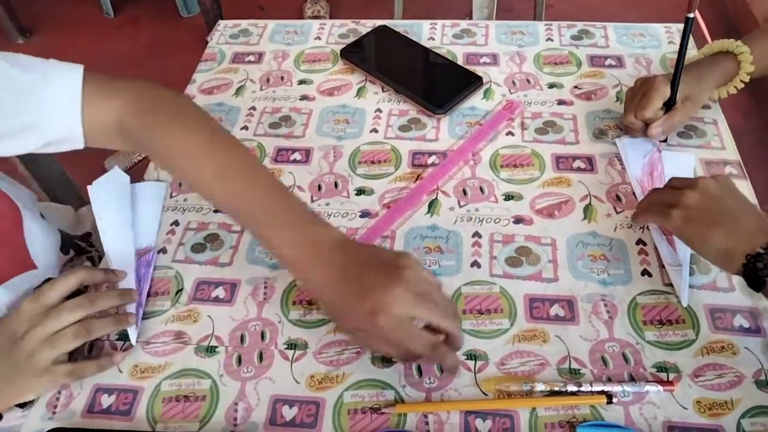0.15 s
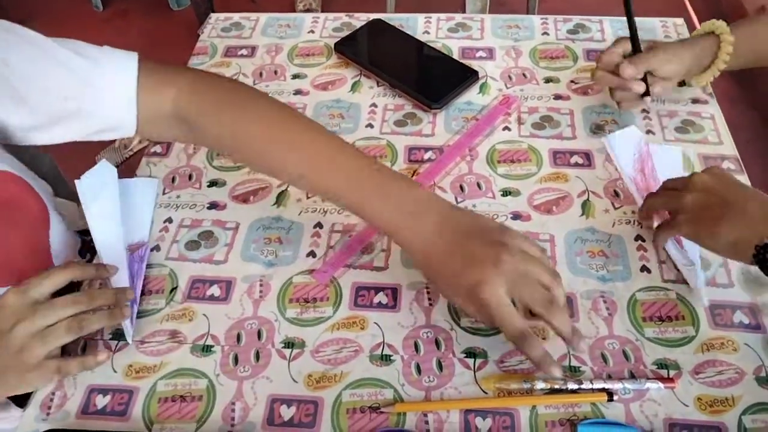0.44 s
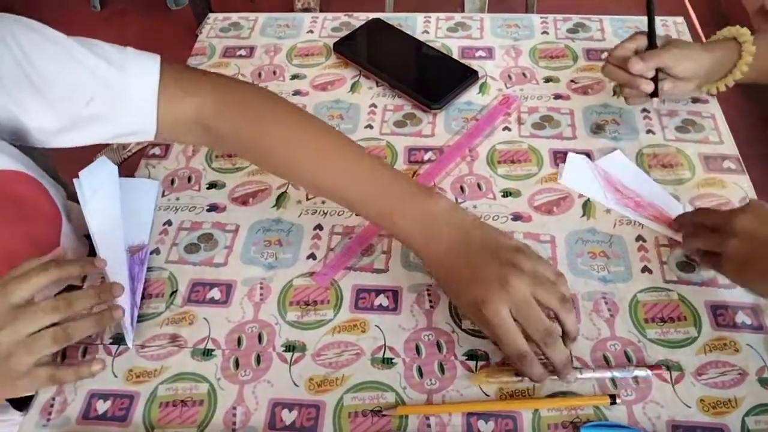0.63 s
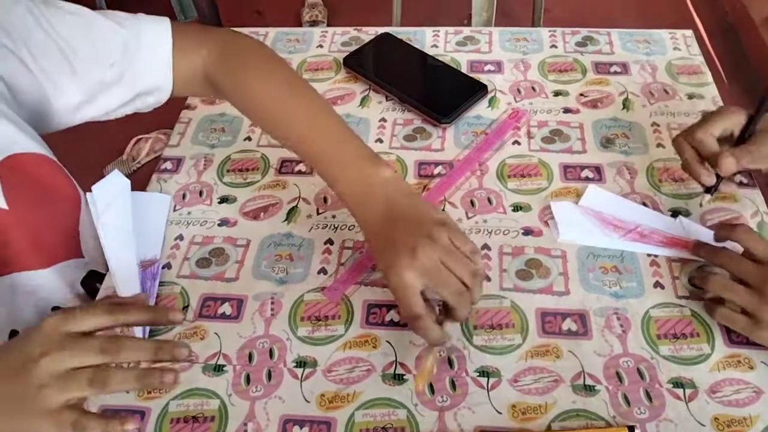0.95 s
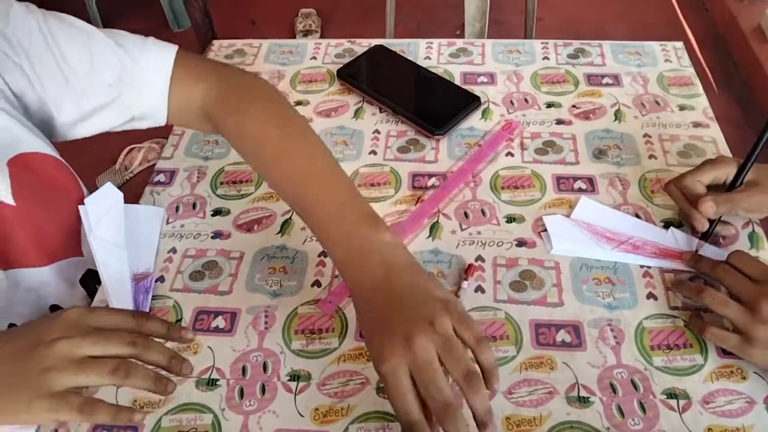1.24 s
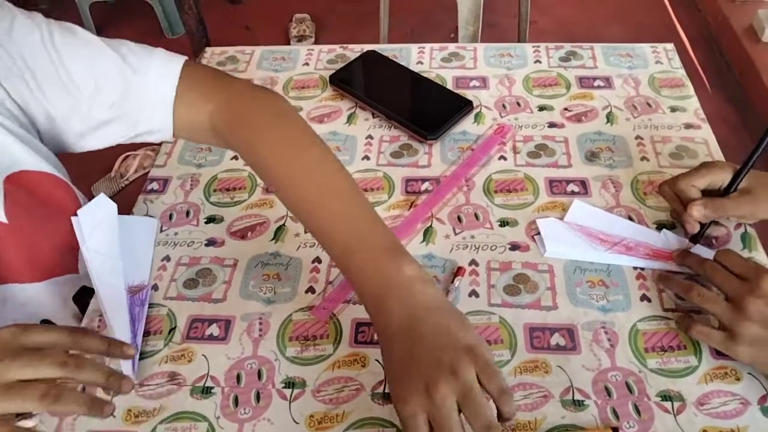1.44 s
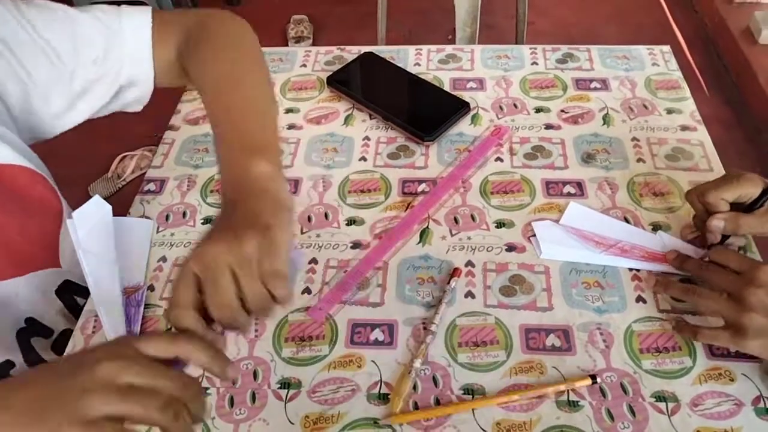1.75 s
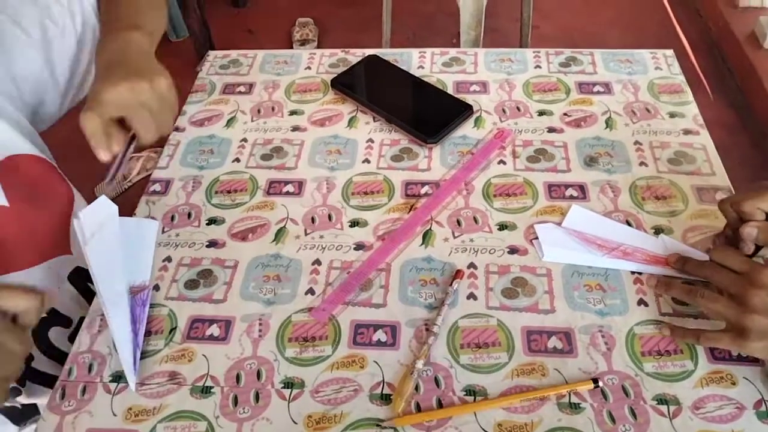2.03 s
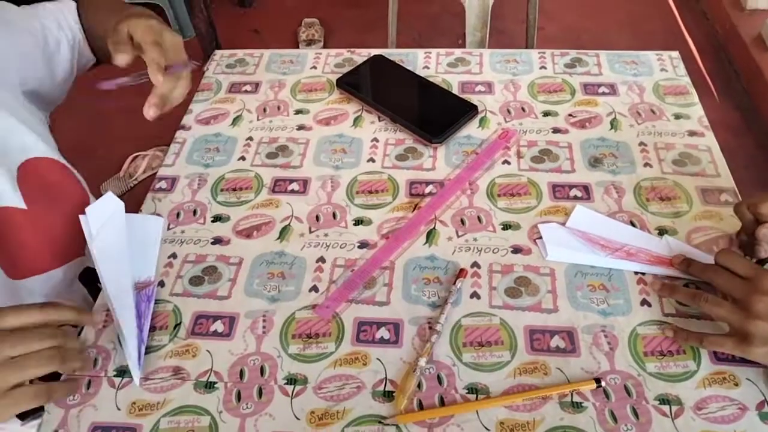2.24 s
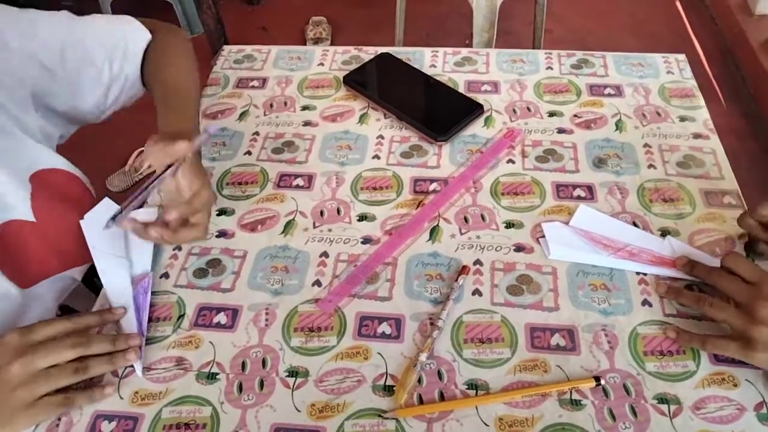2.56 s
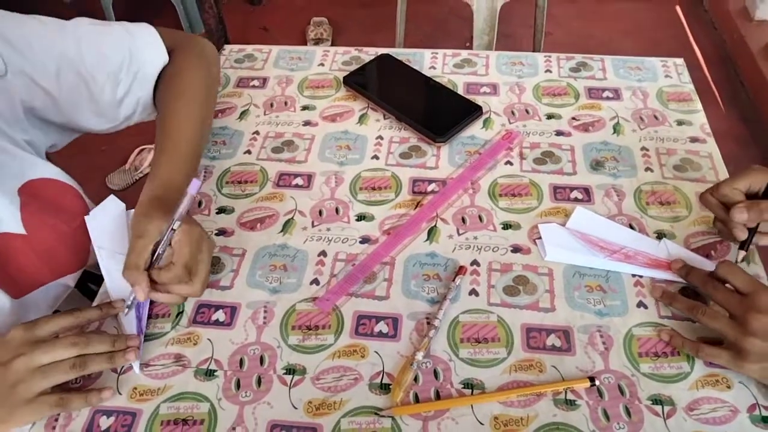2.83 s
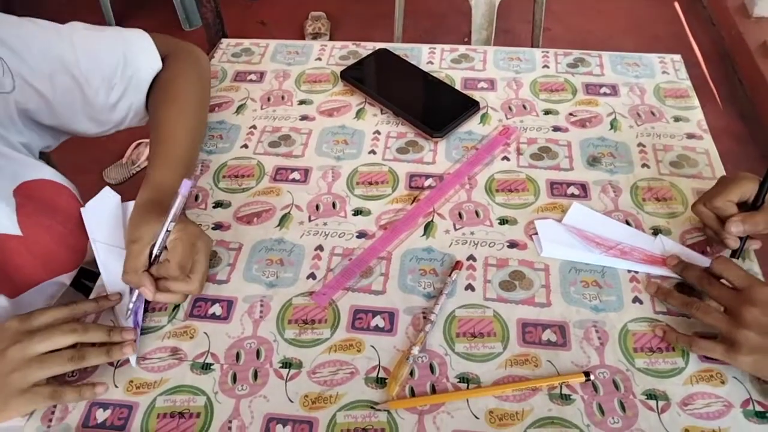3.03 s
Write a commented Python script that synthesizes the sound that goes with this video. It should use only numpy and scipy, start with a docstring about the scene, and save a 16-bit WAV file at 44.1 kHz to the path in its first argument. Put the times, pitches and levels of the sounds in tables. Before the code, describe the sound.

A hand rummages through clicking pens on a tabletop while a distant engine putters.

```python
"""Pens and paper at a cloth-covered table.

A small, hard room, one microphone near a table where two people draw on folded paper. A hand sweeps
the cloth and rummages among pens and pencils, whose barrels clack together and knock the tabletop;
one is picked up and ticks lightly. Outside, farther off, a slow single-cylinder engine putters,
one exhaust puff per firing, and fades away."""
import sys
import numpy as np
from scipy import signal
from scipy.fft import rfft, irfft, next_fast_len
from scipy.io import wavfile
from scipy.ndimage import map_coordinates

SR = 44100
rng = np.random.default_rng(int(sys.argv[2]) if len(sys.argv) > 2 else 0)


def to_wav(sig):
    """Store sig (one row per channel, or 1-D mono) as 16-bit WAV at the path in sys.argv[1].

    Samples outside -1..1 are clipped; the rate is SR.
    """
    pcm = np.clip(np.atleast_2d(sig), -1, 1) * 32767
    pcm = np.round(pcm).astype(np.int16)
    wavfile.write(sys.argv[1], SR, pcm.T)  # frames by channels


N = 141120

# modes of a pen barrel: multiple of its pitch, level/dB, t60/s
BARREL_MODES = [(.48, -21, 0.0061), (.7, -17.5, 0.0081), (1, 1, 0.0071), (1.24, -14.5, .009),
                (1.55, -4, 0.003), (2.25, -9.5, 0.0044)]
# the exhaust as heard from the table: t/s, level/dB
ENGINE_LEVEL = [(0, -38.5), (.7, -40.5), (1.1, -41), (1.35, -47.5), (1.6, -42), (2.2, -44), (2.75, -47),
                (3.2, -54)]
CONTACT_RISE_S, BARREL_RISE_S = 0.00021, 0.00036


def amp(db):
    """Decibels to gain."""
    return 10 ** (np.asarray(db) / 20)


def unit(x):
    """Scale to rms 1."""
    return x / np.sqrt(np.mean(x ** 2) + 1e-20)


def along(points, hz):
    """Interpolate (f/Hz, value) points on a log frequency axis."""
    freqs, values = np.transpose(points)
    return np.interp(np.log(hz + 1), np.log(freqs + 1), values)


def curve(rows):
    """(t/s, value) points as one value per sample."""
    return np.interp(np.arange(N) / SR, *np.transpose(rows))


def fade(t, t60):
    """Exponential decay, 60 dB down at t60."""
    return np.exp(-np.log(1000) * t / t60)


def coloured(x, spectrum):
    """x through a minimum-phase filter with the given (f/Hz, level/dB) points."""
    size = 2 * next_fast_len(len(x))
    cepstrum = irfft(np.log(amp(along(spectrum, np.fft.rfftfreq(size, 1 / SR)))))
    cepstrum[1:size // 2] *= 2
    cepstrum[size // 2 + 1:] = 0
    return irfft(rfft(x, size) * np.exp(rfft(cepstrum)))[:len(x)]


def noise(spectrum, size=N):
    """Coloured noise of rms 1."""
    return unit(coloured(rng.standard_normal(size), spectrum))


def ring(modes, t, pitch=1):
    """Damped modes whose phases and levels vary from blow to blow."""
    return sum(amp(db + rng.standard_normal()) * fade(t, t60)
               * np.sin(2 * np.pi * (pitch * hz * t + rng.random())) for hz, db, t60 in modes)


def pen_clacks():
    """Each contact rings the barrel for a few milliseconds, with a bright tick and a crack."""
    # pen contacts: t/s, barrel f/Hz, barrel level/dB, tick level/dB
    clacks = [(.1315, 2200, -28, -38), (.301, 2500, -47, -22), (0.6084, 3900, -39, -11.5),
              (0.6355, 2720, -20, -9), (0.6691, 2650, -42, -11), (0.6884, 2290, -20.5, -19),
              (0.803, 4030, -18.5, -15), (.8050, 2500, -8, -16), (0.8057, 1500, -14, -19),
              (0.8143, 4370, -14, -38), (0.9377, 2060, -10.5, -5), (0.94, 1750, -8.5, -4),
              (.942, 2200, -13.5, -13.5), (.9615, 2120, -4.5, -9.5), (0.9635, 1710, -13.5, -20),
              (1.012, 2460, -28, -20.5), (1.2286, 2450, -16, -18), (1.2636, 2720, -15, -17),
              (1.269, 2300, -19.5, -19.5), (1.2824, 2280, -10, -25), (1.3661, 2380, -11, -16),
              (1.3676, 2170, -9.5, -16.5), (1.4282, 2400, -31, -16.5), (1.4896, 2560, -1, -3),
              (1.4908, 3200, -9, -18), (2.263, 2620, -27.5, -54), (2.2971, 2480, -34.5, -36),
              (2.542, 2600, -56, -23), (2.7508, 2640, -24, -26), (2.861, 1920, -35.5, -60),
              (2.877, 1870, -38, -60), (2.9405, 2820, -39.5, -28), (3.1662, 2740, -38, -24.5)]
    # the tick's ringing: f/Hz, level/dB, t60/s
    tick_modes = [(8630, -2.5, 0.0046), (9070, -7, 0.0064)]
    # noise burst of a contact: f/Hz, level/dB
    crack_spectrum = [(300, -17), (1500, -13), (2800, -4), (4800, -8), (7000, 2), (9000, 11.5),
                      (11000, -9.5), (15000, -7.5)]
    out, t = np.zeros(N), np.arange(SR // 20) / SR
    tick_rise = 1 - np.exp(-t / CONTACT_RISE_S)
    barrel_rise = 1 - np.exp(-t / BARREL_RISE_S)
    for start, hz, barrel_db, tick_db in clacks:
        tick = ring(tick_modes, t)
        crack = amp(-3) * noise(crack_spectrum, len(t)) * fade(t, t60=0.0095)
        barrel = amp(barrel_db) * barrel_rise * ring(BARREL_MODES, t, hz)
        add(out, start, in_room(barrel + amp(tick_db) * tick_rise * (tick + crack)))
    return out


def pen_snap():
    """One dry plastic snap as a pen is taken in both hands."""
    # the plastic's ringing: f/Hz, level/dB, t60/s
    snap_modes = [(2600, 0.5, 0.0088), (3800, -2, 0.005), (6840, 10, 0.0031), (8460, 0.5, 0.004),
                  (13700, -4, .003)]
    out, t = np.zeros(N), np.arange(SR // 20) / SR
    snap = amp(-10.5) * (1 - np.exp(-t / BARREL_RISE_S)) * ring(snap_modes, t)
    add(out, start_s=1.8231, sound=in_room(snap, wet_db=-5))
    return out


def pen_jostle(contacts=12, centre_hz=2885, spread_octaves=0.34, spread_db=2):
    """Pens roll against each other: runs of light contacts, each ringing at a pitch of its own."""
    # runs of contacts: t/s, length/s, contact level/dB
    runs = [(0.619, 0.099, -26.5), (.812, .035, -24), (1.261, .04, -25), (1.831, 0.11, -44)]
    out, t = np.zeros(N), np.arange(SR // 20) / SR
    rise = 1 - np.exp(-t / BARREL_RISE_S)
    for start, length, db in runs:
        for k in range(contacts):
            detune, force = rng.standard_normal(2)
            contact = rise * ring(BARREL_MODES, t, centre_hz * 2 ** (spread_octaves * detune))
            onset = start + length * (k + rng.random()) / contacts
            add(out, onset, amp(db + spread_db * force) * contact)
    return in_room(out)[:N]


def tabletop(hold_s=0.0017):
    """Hand and pens thud on the table: loose things rattle and its low modes ring on."""
    # knocks: t/s, thud f/Hz, thud level/dB, ringing level/dB, rattle level/dB
    knocks = [(0.131, 218, -24, -50, -45.5), (0.613, 235, -39, -36.5, -53), (.805, 220, -29, -31.5, -33),
              (.939, 233, -29, -31, -27.5), (.964, 215, -24.5, -33.5, -31.5), (1.229, 267, -31, -63, -45),
              (1.259, 284, -32.5, -45, -38.5), (1.491, 516, -38.5, -49, -46)]
    # the tabletop's resonances: f/Hz, level/dB, t60/s
    table_modes = [(227.5, 1, 0.22), (403, -0.5, 0.28), (472, -4.5, 0.42)]
    # colour of a thud: multiple of its pitch, level/dB
    thud_shape = [(.3, -24), (.75, -4.5), (1, 7.5), (1.7, -20), (2.9, -5), (4.2, -34.5), (8, -18.5),
                  (16, -52.5)]
    # loose things on the table: f/Hz, level/dB
    rattle_spectrum = [(500, -5.5), (1200, -5), (2300, -4), (5200, -16.5), (8700, -3.5), (11500, -21)]
    out, t = np.zeros(N), np.arange(SR // 2) / SR
    rise = 1 - np.exp(-t / CONTACT_RISE_S)
    after_hold = np.maximum(t - hold_s, 0)
    for start, hz, thud_db, ring_db, rattle_db in knocks:
        thud_spectrum = [(multiple * hz, db) for multiple, db in thud_shape]
        thud = amp(thud_db) * noise(thud_spectrum, len(t)) * fade(after_hold, t60=0.11)
        rattle = amp(rattle_db) * noise(rattle_spectrum, len(t)) * fade(after_hold, t60=0.32)
        ringing = amp(ring_db) * ring(table_modes, t)
        add(out, start, rise * (thud + ringing + rattle))
    return out


def friction(spectrum, slips_per_s=900, spread_db=3, slip_share=0.53):
    """Tiny slips of uneven size on a smooth hiss; the slips ring the resonances more sharply."""
    slips = (rng.random(N) < slips_per_s / SR) * rng.choice([-1, 1], N)
    sizes = amp(spread_db * np.minimum(rng.exponential(size=N), 3))
    grains = unit(coloured(coloured(slips * sizes, spectrum), spectrum))
    return np.sqrt(slip_share) * grains + np.sqrt(1 - slip_share) * noise(spectrum)


def hand_on_cloth():
    """Skin hisses over the cloth, brighter when fast, and rubs a low rumble from the table."""
    # the sliding hand: t/s, level/dB
    sweep = [(.28, -80), (.31, -45), (.484, -40.5), (.493, -29.5), (.577, -43), (.588, -29.5), (.61, -26),
             (.66, -29), (.74, -39), (.8, -39.5), (.9, -62), (1.0, -61), (1.2, -77), (1.26, -43),
             (1.325, -36.5), (1.42, -42.5), (1.6, -59.5)]
    # skin on cloth: f/Hz, level/dB
    cloth_spectrum = [(700, -14.5), (1500, -17), (2400, -11.5), (4000, -7.5), (5200, -14.5), (7400, -2),
                      (8700, 1.5), (10300, -8.5), (11800, -16), (14000, -10.5)]
    # the rubbed table: f/Hz, level/dB
    rub_spectrum = [(50, 4), (110, -5.5), (220, 1.5), (1000, -32.5), (3000, -38)]
    # top end of a fast stroke: f/Hz, level/dB
    fizz_spectrum = [(3000, -49), (9000, -0.5), (12000, -9.5), (13800, 2.5), (15500, -3.5)]
    stroke_db = curve(sweep)
    from_peak_db = stroke_db - stroke_db.max()
    hiss = amp(stroke_db) * friction(cloth_spectrum)
    rub = amp(-35 + 1.33 * from_peak_db) * noise(rub_spectrum)
    fizz = amp(-22.5 + 4.4 * from_peak_db) * friction(fizz_spectrum)
    return hiss + rub + fizz


def paper():
    """Brief rustles and pencil scratches, each a swell of fine friction."""
    # strokes on the paper: t/s, length/s, level/dB
    rustles = [(1.822, 0.057, -43), (1.927, 0.12, -53.5), (2.248, 0.036, -43), (2.51, 0.28, -56),
               (2.734, 0.051, -44), (3.156, 0.043, -52.5)]
    # paper friction: f/Hz, level/dB
    paper_spectrum = [(700, -12.5), (2400, -5.5), (4800, -9), (6500, -3.5), (8700, -4), (11000, -13),
                      (14500, -8.5)]
    out = np.zeros(N)
    scratch = friction(paper_spectrum, slips_per_s=1400)
    for start, length, db in rustles:
        stroke = scratch[int(start * SR):][:int(length * SR)]
        add(out, start, amp(db) * stroke * np.sin(np.linspace(0, np.pi, len(stroke))))
    return out


def engine(first_firing_s=0.036, jitter_s=0.0001, spread_db=0.6, clatter_decay_s=0.041):
    """The single cylinder outside: each firing sends a pulse to the exhaust and lifts a faint clatter."""
    # engine speed: t/s, firing rate/Hz
    firing_rate = [(0, 25.35), (.5, 25.25), (1.15, 24.95), (1.5, 24.35), (2.2, 24.2), (2.4, 23.75),
                   (3.2, 23.65)]
    # the clatter receding: t/s, level/dB
    clatter_level = [(0, -45), (.3, -50.5), (1.7, -51.5), (2.0, -58.5), (3.2, -63.5)]
    # clattering metal: f/Hz, level/dB
    metal_spectrum = [(500, 5), (1100, -15), (1800, -8.5), (2400, 0.5), (3200, -19.5), (6000, -22.5)]
    rate = curve(firing_rate)
    cycles = np.cumsum(rate) / SR - first_firing_s * rate[0]
    firings = np.flatnonzero(np.diff(np.floor(cycles)))
    lateness, force = rng.standard_normal((len(firings), 2)).T
    onsets = np.clip(firings + (jitter_s * SR * lateness).astype(int), 0, N - 1)
    pulses = np.zeros(N)
    pulses[onsets] = amp(spread_db * force)
    putter = exhaust(pulses)
    since_firing_s = (cycles % 1) / rate
    clatter = unit(noise(metal_spectrum) * (np.exp(-since_firing_s / clatter_decay_s) + 0.83))
    return putter + amp(curve(clatter_level)) * clatter


def exhaust(pulses):
    """The yard's walls smear every puff alike; the colour shifts as the engine moves off."""
    # exhaust at its nearest: f/Hz, level/dB
    near_spectrum = [(25, -51), (48, 4.5), (75, -2.5), (125, 5), (165, -9), (250, 0), (300, -17),
                     (360, -2.5), (520, -27), (1500, -49)]
    # at middle distance: f/Hz, level/dB
    mid_spectrum = [(30, -32), (72, 2), (105, -13), (145, 2), (175, -16.5), (225, 7), (290, -14.5),
                    (370, -7), (520, -27), (1500, -45)]
    # far off: f/Hz, level/dB
    far_spectrum = [(25, -32), (95, 2.5), (140, -12), (175, -12.5), (245, 3), (305, -17), (380, -9.5),
                    (520, -38), (1500, -40.5)]
    # near until, mid from, mid until, far from: each t/s
    crossfades = [.8, 1.6, 2.1, 2.5]
    t = np.arange(N) / SR
    yard = rng.standard_normal(SR // 10) * fade(t[:SR // 10], t60=0.07)
    puffs = pulses + amp(-3) * signal.fftconvolve(pulses, yard / np.linalg.norm(yard))[:N]
    near = np.interp(t, crossfades[:2], [1, 0])
    far = np.interp(t, crossfades[2:], [0, 1])
    blend = [(near, near_spectrum), (1 - near - far, mid_spectrum), (far, far_spectrum)]
    putter = sum(weight * unit(coloured(puffs, spectrum)) for weight, spectrum in blend)
    return amp(curve(ENGINE_LEVEL)) * putter


def ambience(wavers_per_s=8, waver_db=1):
    """Background air: a slightly wavering hiss and a rumble that recedes with the engine."""
    # the hiss over time: t/s, level/dB
    hiss_level = [(0, -47), (1.1, -52.5), (1.7, -49.5), (2.2, -54.5), (3.2, -59.5)]
    # its colour: f/Hz, level/dB
    hiss_spectrum = [(500, 5.5), (950, -5), (2300, -2), (3500, -7.5), (5200, -16), (7000, -7.5),
                     (8500, -2.5), (11000, -22), (14500, -19)]
    # low rumble: f/Hz, level/dB
    rumble_spectrum = [(15, -1), (45, -7.5), (110, -4.5), (300, -12), (1500, -51)]
    knots = np.arange(N) * wavers_per_s / SR
    waver = map_coordinates(rng.standard_normal(int(knots[-1]) + 2), [knots])
    hiss = amp(curve(hiss_level) + waver_db * waver) * noise(hiss_spectrum)
    engine_db = curve(ENGINE_LEVEL)
    rumble = amp(-48.5 + 0.5 * (engine_db - engine_db.mean())) * noise(rumble_spectrum)
    return hiss + rumble


def in_room(x, wet_db=0, delay_s=0.0024):
    """Direct sound, then early reflections off the hard walls and a tail whose treble dies first."""
    # the room's reverberation: f/Hz, t60/s
    room_decay = [(200, 0.64), (2400, 0.34), (15000, 0.11)]
    hz, t, bands = signal.stft(rng.standard_normal(SR // 2), SR, nperseg=256)
    tail = signal.istft(bands * fade(t, along(room_decay, hz)[:, None]), SR, nperseg=256)[1]
    early = rng.standard_normal(len(tail)) * fade(np.arange(len(tail)) / SR, t60=0.035)
    walls = amp(-14) * tail / np.linalg.norm(tail) + amp(-12.5) * early / np.linalg.norm(early)
    return signal.fftconvolve(x, np.r_[1, np.zeros(int(delay_s * SR)), amp(wet_db) * walls])


def add(track, start_s, sound):
    """Mix a sound into the track."""
    part = track[int(start_s * SR):][:len(sound)]
    part += sound[:len(part)]


def scene():
    """In mono: the table in front, the engine outside, the air behind both."""
    air = ambience()
    table = pen_clacks() + pen_snap() + pen_jostle() + tabletop() + hand_on_cloth() + paper()
    return (table + engine() + air)[None]


def record(dry):
    """The recorder clips at full scale and keeps nothing above its band limit."""
    size = next_fast_len(N + SR // 2)
    passband = np.fft.rfftfreq(size, 1 / SR) < 15650
    return irfft(rfft(np.clip(dry, -1, 1), size) * passband, size)[:, :N]


dry = scene()
out = record(dry)
to_wav(out)
```